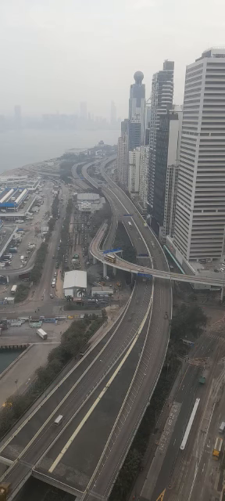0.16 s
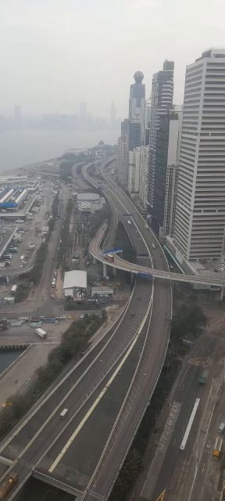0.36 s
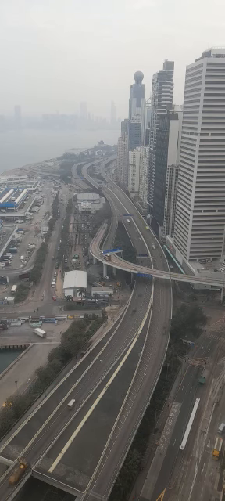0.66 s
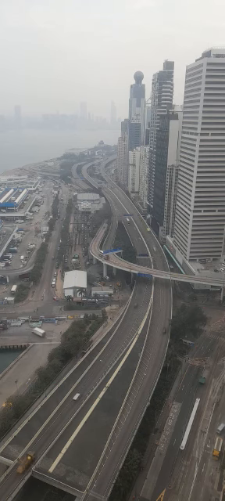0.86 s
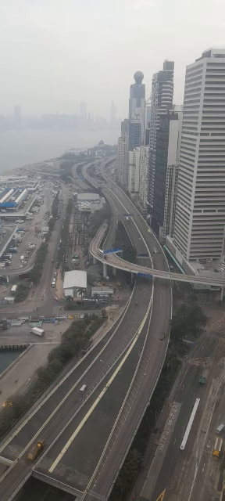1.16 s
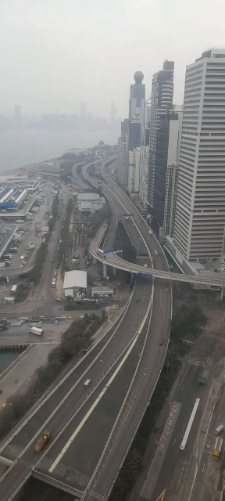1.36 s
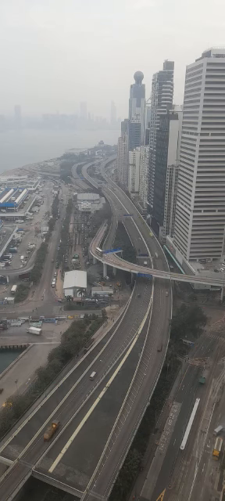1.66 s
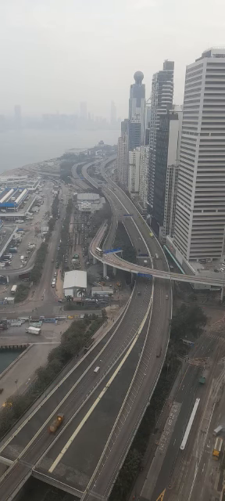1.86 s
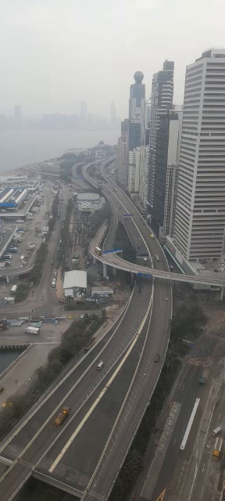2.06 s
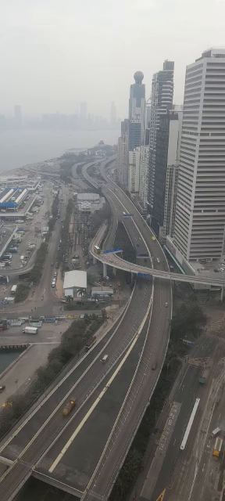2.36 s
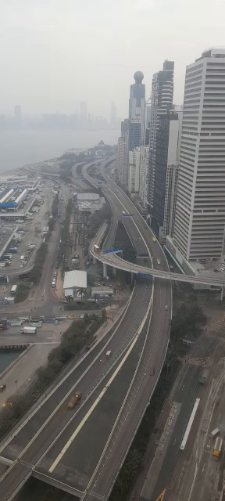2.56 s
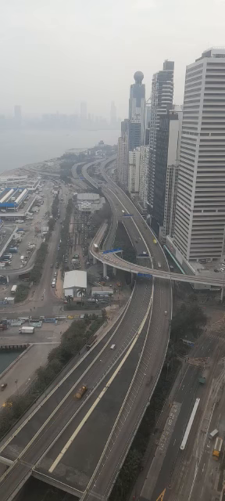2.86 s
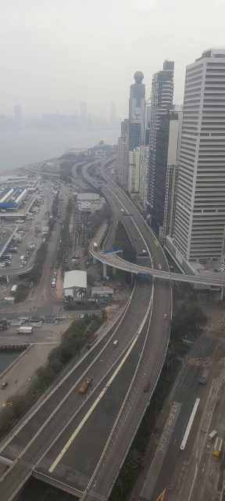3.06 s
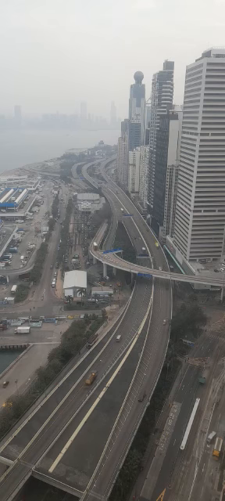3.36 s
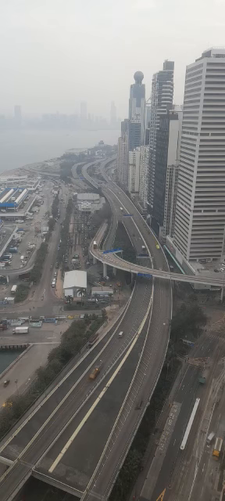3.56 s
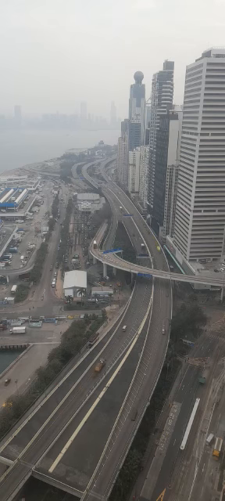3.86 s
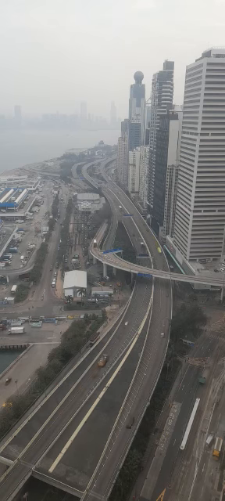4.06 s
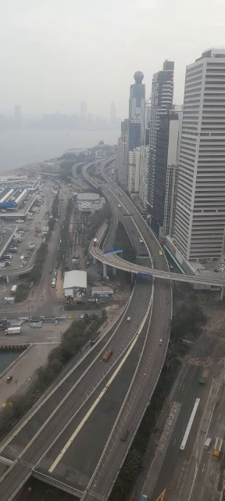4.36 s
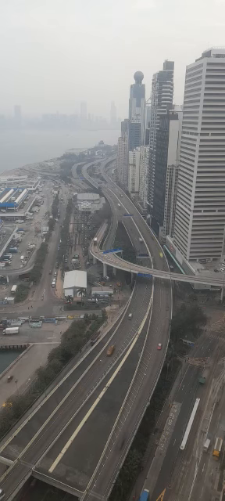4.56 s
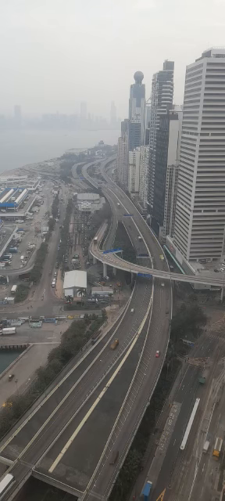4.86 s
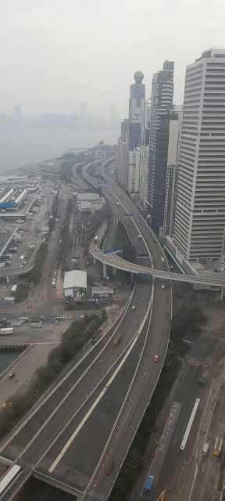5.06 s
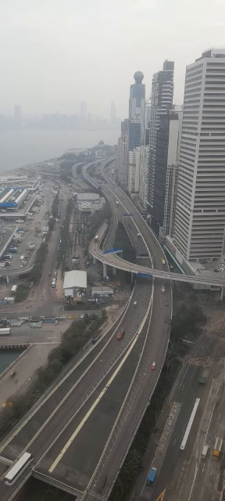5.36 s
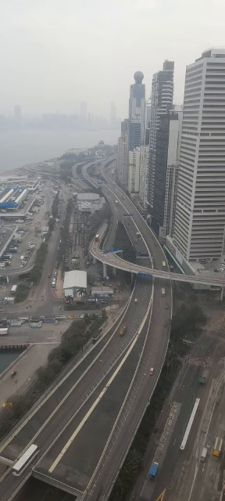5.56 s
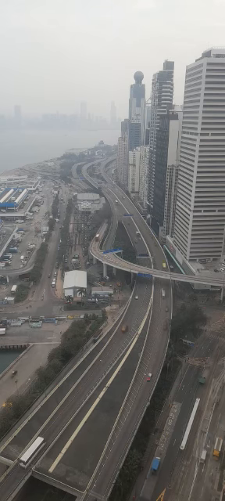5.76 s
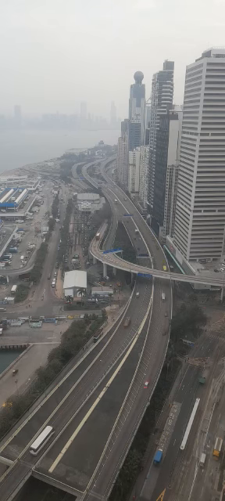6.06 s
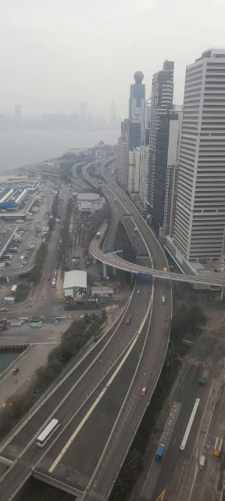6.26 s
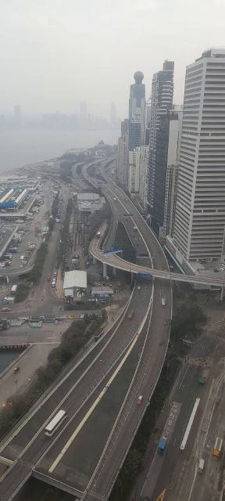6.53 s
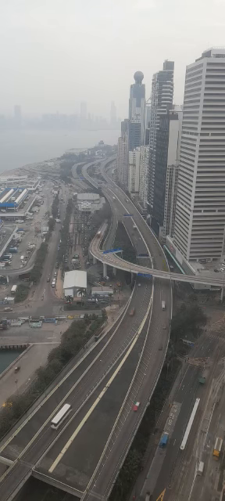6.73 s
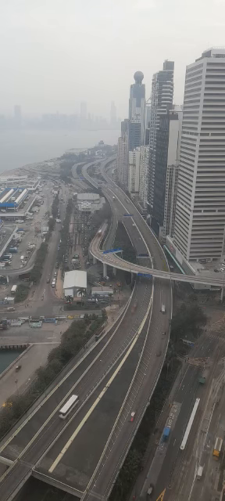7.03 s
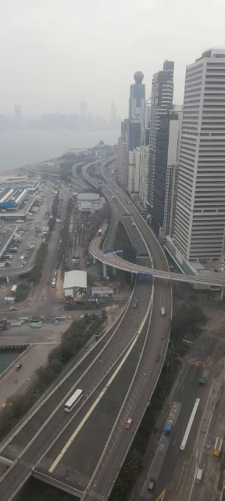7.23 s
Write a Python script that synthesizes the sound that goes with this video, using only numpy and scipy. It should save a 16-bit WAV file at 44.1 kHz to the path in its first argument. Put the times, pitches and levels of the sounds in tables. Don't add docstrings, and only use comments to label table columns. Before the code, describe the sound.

From high above an elevated city highway, a dull continuous rumble of tyres and engines dominates. A ventilation hum wavers on top and a far cutting blade sings thinly, brightest early. Deck joints thump in the first second, small metal knocks follow around two and a half seconds, then faint paired horn toots. A heavy vehicle gathers speed at the end. Distant stereo microphones add light hiss.

```python
import sys
import numpy as np
from scipy import signal
from scipy.fft import rfft, irfft, next_fast_len
from scipy.io import wavfile
from scipy.ndimage import uniform_filter1d

SR = 44100
rng = np.random.default_rng(int(sys.argv[2]) if len(sys.argv) > 2 else 0)


def transcribe(signal):
    frames = np.atleast_2d(signal).T
    limited = np.clip(frames, -1, 1)
    pcm = np.round(limited * 32767).astype(np.int16)
    wavfile.write(sys.argv[1], SR, pcm)


def makeup_ratio(level_db):
    decades = np.asarray(level_db, float) / 20
    return 10 ** decades


N = 325899
T = np.arange(N) / SR


def rms_one(x):
    return x / np.sqrt(np.mean(x ** 2) + 1e-20)


def in_time(rows):
    s, *columns = np.transpose(rows)
    return [np.interp(T, s, c) for c in columns]


def at_hz(points, hz):
    p = np.transpose(points)
    return [np.interp(np.log(hz + 1), np.log(p[0]), c) for c in p[1:]]


def swell(s, length):
    return np.exp(-(2 * (T - s) / length) ** 2)


def gate(s, length, edge_s):
    return np.clip(np.minimum(T - s, s + length - T) / edge_s, 0, 1)


def drift(rate):
    r = np.exp(-80 * np.pi * rate / SR)
    noise = rng.standard_normal(N // 40 + 2002)
    slow = signal.lfilter([1], [1, -2 * r, r * r], noise)[2000:]
    return np.interp(np.arange(N) / 40, np.arange(len(slow)), rms_one(slow))


def glide(rows):
    hz, level_db = in_time(rows)
    start = rows[0][0]
    return hz, makeup_ratio(level_db) * np.clip((T - start + (start == 0)) / 0.17, 0, 1)


def drone(hz, level, wobble_hz, flutter_db, gain_db):
    phase = 2 * np.pi * np.cumsum(hz + wobble_hz * drift(13.0)) / SR
    return np.sqrt(2) * level * makeup_ratio(gain_db + flutter_db * drift(11.8)) * np.sin(phase)


def resonate(x, hz, width_hz):
    r = np.exp(-np.pi * width_hz / SR)
    return signal.lfilter([1, 0, -1], [1, -2 * r * np.cos(2 * np.pi * hz / SR), r * r], x)


# frequency in Hz, likeness 0-1, lead of the left in rad,
# left minus right in dB.
PORTS = [(29.8, 1, -1.5, 3), (70, 0.96, 0.37, -3.5), (110, 0.98, 0.23, 0), (163, 0.97, 0.01, -.5),
         (234, 0.98, 0.24, -.6), (290, 1, 0.3, -5), (415, 0.86, 0.07, -5.5), (600, 0.6, 1.36, -3),
         (714, 0.33, 1, -4.5), (1290, 0.51, 3, -1.5), (1480, 0.54, 2.5, -1), (2170, 0.44, 7, -1.5),
         (2800, 0, 7, -1), (6000, 0.36, 12, 2.5), (16000, 0, 6, 0)]


def at_ports(shared, own):
    size = 2 * (len(shared) - 1)
    alike, lead, pan_db = at_hz(PORTS, np.fft.rfftfreq(size, 1 / SR))
    alike = np.clip(alike, 0, 1)
    side = np.array([[.5], [-.5]])
    common = np.sqrt(alike) * shared * np.exp(1j * lead * side)
    both = common + np.sqrt(1 - alike) * own
    return irfft(both * makeup_ratio(pan_db * side), size)[:, :N]


def arrive(x):
    taper = np.linspace(1, 0, 4096)
    before = (x[:4096] * taper)[::-1]
    after = x[:-4097:-1] * taper
    gap = np.zeros(2 * next_fast_len(N // 2 + 4097) - N - 8192)
    wave = rfft(np.concatenate([x, after, gap, before]))
    return at_ports(wave, wave)


def crowd(spectrum, even_s, ripple_db=0):
    size = 2 * next_fast_len(N // 2 + 1)
    hz = np.fft.rfftfreq(size, 1 / SR)
    ripple = np.interp(hz, np.arange(1200) * 20, rng.standard_normal(1200))
    colour = makeup_ratio(at_hz(spectrum, hz)[0] + ripple_db * ripple)
    waves = rfft(rng.standard_normal((3, N)), size) * colour
    x = at_ports(waves[0], waves[1:])
    span = int(even_s * SR)
    power = uniform_filter1d(uniform_filter1d(x.mean(axis=0) ** 2, span), span)
    return x / np.sqrt(power + 1e-20)


# time in seconds, level in dB.
CUT = [(0, 2), (.5, 1), (1.35, 1.5), (1.46, 0), (1.8, 2.5), (2.04, -0.5), (2.2, 0.5), (2.42, -0.5),
       (3.5, 1), (3.59, -0.5), (3.7, 1.5), (5.78, 0.5), (5.9, 1), (6.55, -1.5), (6.78, 3.5), (6.98, -0.5),
       (7.17, 1.5), (7.26, -2.5)]


def cut_pressure_db():
    return in_time(CUT)[0]


# time in seconds, level in dB.
FLOW = [(0, -56), (.2, -58), (.5, -58), (2.3, -58.5), (2.85, -59), (3.3, -58), (4.1, -55), (5.3, -58),
        (6.0, -55), (6.6, -54), (7.39, -56.5)]
# frequency in Hz, level in dB per Hz.
RUMBLE = [(12, -32), (22, -20), (27, -34), (34, -34), (50, -11.5), (61, 0.5), (70, -1), (95, 0.5),
          (114, 2.5), (135, -1.5), (170, -9.5), (220, -35), (370, -120)]
DRONE = [(100, -37), (170, 0), (232, 0.5), (291, 0.5), (310, 1), (344, -8), (420, -19), (550, -24.5),
         (920, -120)]
ROAR = [(250, -19), (420, -5), (459, -6.5), (618, -4.5), (945, -11.5), (1030, -10.5), (1600, -16),
        (2080, -33), (3520, -120)]
WASH = [(1300, -19), (1600, 1), (2500, 0.5), (3250, -7.5), (3900, -3.5), (4200, -8), (4800, -3),
        (5300, -2.5), (5800, -11.5), (6400, -6), (7150, -6), (7500, -4), (7900, -56), (8400, -63)]
# level in dB at mean flow, share of the flow's swing, own unsteadiness in dB.
DECK_CROWD = (-40.5, 0.31, 0.97)
DRONE_CROWD = (-48, 1, 1.67)
ROAR_CROWD = (-57.5, 1.0, 1)
WASH_CROWD = (-67, .6, 1)
# centre in seconds, length in seconds, level in dB.
AXLES = [(0.366, 0.1, 4.5), (0.85, 0.076, 5), (1.807, 0.043, 7), (2.55, .14, -6.5), (2.9, 0.067, 5.5),
         (3.395, .4, 0.5), (3.873, .18, -6), (4.01, .1, 1.5), (4.187, 0.1, -0.5), (4.44, .16, -5),
         (4.98, 0.13, 0.5), (5.625, 0.1, 1), (6.33, .08, 3), (6.87, 0.16, 2), (7.152, 0.1, 2),
         (7.26, .08, -7), (7.367, .1, 4.5)]


def traffic():
    mean_flow_db, echo_db = -57.5, 1.1
    swing_db = in_time(FLOW)[0] - mean_flow_db
    axles_db = sum(db * swell(s, length) for s, length, db in AXLES)

    def level_db(settings, rate):
        db, share, own_db = settings
        return db + share * swing_db + own_db * drift(rate)

    deck = makeup_ratio(level_db(DECK_CROWD, 5.2) + axles_db) * crowd(RUMBLE, even_s=0.23)
    low = makeup_ratio(level_db(DRONE_CROWD, 2.5) + .3 * axles_db) * crowd(DRONE, even_s=0.19)
    roar = makeup_ratio(level_db(ROAR_CROWD, 1.5)) * crowd(ROAR, even_s=0.15, ripple_db=echo_db)
    wash_db = level_db(WASH_CROWD, 21.0) + 0.47 * cut_pressure_db()
    wash = makeup_ratio(wash_db) * crowd(WASH, even_s=0.21, ripple_db=echo_db)
    return deck + low + roar + wash


# time in seconds, pitch in Hz, level in dB.
VENT = [(0, 291, -51.5), (1.35, 280.2, -51.5), (1.7, 291.8, -45), (3.25, 290, -49), (3.8, 290.5, -46),
        (4.9, 289.4, -47), (5.5, 299, -53), (6.0, 285, -48.5), (7.39, 278.8, -69)]


def ventilation():
    return drone(*glide(VENT), wobble_hz=2.0, flutter_db=2.0, gain_db=-2.5)


# centre in seconds, length in seconds, rise in dB.
IDLING = [(.08, 0.34, 4.5), (0.624, 0.2, 9), (.88, 0.19, 9), (2.2, 0.73, 6), (3.407, 0.76, 7),
          (4.13, 0.41, 10), (4.65, .2, 10), (5.702, 0.37, 11.5), (6.4, .6, 6)]


def idling_engine():
    throb = makeup_ratio(-46 + sum(db * swell(s, length) for s, length, db in IDLING))
    return drone(78.66, throb, wobble_hz=1.857, flutter_db=4.0, gain_db=-5.0)


# pitch in Hz, width in Hz, level in dB.
MOTORS = [(196, 14, -56), (266, 10, -60), (365, 12, -70), (388, 12, -69), (420, 12, -71), (615, 60, -71)]


def motors():
    out = np.zeros(N)
    for hz, width_hz, level_db in MOTORS:
        noise = rng.standard_normal(N)
        band = resonate(resonate(noise, hz, width_hz), hz, width_hz)
        out += makeup_ratio(level_db + 1.3 * drift(1.26)) * rms_one(band)
    return out


BLADE_HZ = [
    [1520, 1770, 1850, 2103, 2291, 2452],
    [4220, 4310, 4468, 3940],
    [5055, 5140, 5462, 5545, 5670, 6005],
    [6654, 6770, 6851, 7350, 7450],
    [8610, 9450, 10900],
]
# width in Hz, level in dB, left minus right in dB.
BLADE = [
    [(35, -12, -12), (32, -5, -5.5), (34, -5.5, -0.5), (21.6, -6, -3), (28, -8, -5), (37, -9.5, -3)],
    [(52, 0, -0.5), (99, -3, -8), (61.7, -1, 1), (25, -9, 6)],
    [(60, -4.5, 2), (57.5, -1.5, -4), (60, 1.5, -5), (40, -1, -7.5), (70, -3, -6), (52.3, -0.5, 2)],
    [(54, -4.5, -13.5), (100, -4, -1), (43.2, -3, -1.5), (90, -5, -5), (60, -13, 3.5)],
    [(110, -13, 3.5), (120, -19, -3), (110, -18.5, -4.5)],
]
# level in dB, change in dB per second, share of pressure, unsteadiness in dB.
FAMILIES = [(-67.5, 0.46, 0.99, 1.5), (-69.5, 0.29, 0.97, 1.0), (-66, -.5, 0.38, 1.0),
            (-63, -1.85, 0.79, 1.0), (-64, -2.5, 1.3, 4)]
# start in seconds, length in seconds, pitch in Hz, level in dB.
SQUEALS = [(0.076, .2, 2291, -66), (.28, .18, 5500, -70), (.59, .22, 2440, -69.5), (.716, 0.21, 5560, -65),
           (.78, 0.28, 6654, -67.5), (0.868, .1, 6005, -61), (.88, 0.27, 2103, -77),
           (1.154, 0.18, 2473, -68.5), (1.16, 0.14, 6005, -65), (1.284, 0.15, 6780, -63.5),
           (1.56, .17, 5480, -67), (1.56, 0.2, 2291, -72.5), (1.77, 0.15, 5560, -60),
           (2.122, 0.17, 6810, -62.5), (2.16, .2, 6005, -73), (3.03, 0.22, 5462, -70),
           (3.227, 0.15, 5550, -64), (4.274, .21, 2291, -67.5), (5.104, 0.078, 7420, -70),
           (6.68, 0.27, 4310, -69), (6.7, .18, 5140, -67), (6.82, .1, 5545, -64), (4.75, .4, 8610, -88)]


def blade():
    out, lag = np.zeros((2, N)), 20
    direct, left, right = rng.standard_normal((3, N))
    rub = 0.63 * np.array([direct, np.roll(direct, lag)]) + 0.79 * np.array([left, right])
    pressure_db = cut_pressure_db()
    for pitches, modes, (db, db_per_s, share, own_db) in zip(BLADE_HZ, BLADE, FAMILIES):
        effort_db = db + db_per_s * T + share * pressure_db + own_db * drift(4.2)
        for hz, (width_hz, level_db, pan_db) in zip(pitches, modes):
            own = np.roll(rub, hz * 31, axis=1)
            tone = resonate(resonate(own, hz, 4 * width_hz), hz, width_hz)
            gain = makeup_ratio(effort_db + level_db - 4 + 1.3 * drift(2.5))
            out += gain * rms_one(tone) * makeup_ratio([[pan_db / 2], [-pan_db / 2]])
    every = np.concatenate(BLADE_HZ)
    for s, length, hz, level_db in SQUEALS:
        span = slice(int(s * SR), int((s + length) * SR))
        nearest = every[np.abs(every - hz).argmin()]
        tone = resonate(rub[:, span], nearest, 3.8)
        out[:, span] += makeup_ratio(level_db) * gate(s, length, 0.057)[span] * rms_one(tone)
    return out


# frequency in Hz, level in dB per Hz.
HISS = [(4650, -17), (7900, 2), (8180, -9), (8530, -3), (10300, -3), (13900, -1), (15600, -5)]


def port_hiss():
    level_db = -75.5 + 0.26 * cut_pressure_db() + 0.43 * drift(7.0)
    return makeup_ratio(level_db) * crowd(HISS, even_s=.3)


# start in seconds, pitch in Hz, level in dB, 60 dB decay in seconds.
THUMPS = [
    (0.289, 187.7, -30, 0.44),
    (0.721, 41.6, -42, 0.99),
]


def thumps():
    out = np.zeros(N)
    for s, hz, level_db, t60 in THUMPS:
        age = np.maximum(T - s, 0)
        rise = 1 - np.exp(-age / 0.029)
        out += makeup_ratio(level_db - 60 * age / t60) * rise * np.sin(2 * np.pi * hz * age)
    return out


# centre in seconds, length in seconds, pitch in Hz, level in dB.
PASSING = [(0.303, 0.402, 103, -44.5), (0.677, 0.48, 116.9, -42), (1.691, .9, 108.2, -40),
           (2.5, .9, 119.1, -41), (3.453, .4, 115, -42), (3.825, 0.196, 103.8, -41),
           (4.104, 0.397, 120.9, -40), (4.616, .6, 104.2, -40), (5.129, 0.306, 116, -37.5),
           (5.4, .4, 107.7, -43)]


def passing_engines():
    near = np.array([makeup_ratio(db) * swell(s, length) for s, length, hz, db in PASSING]) + 1e-12
    hz = np.array(PASSING)[near.argmax(axis=0), 2]
    return drone(hz, near.max(axis=0), wobble_hz=3.71, flutter_db=-1.5, gain_db=-4.0)


# start in seconds, peak in dB.
TICKS = [
    (1.514, -56),
    (2.2275, -53),
    (2.574, -43.5),
    (2.592, -51),
]


def knocks():
    out, noise = np.zeros((2, N)), rng.standard_normal((2, N))
    for s, level_db in TICKS:
        age = np.maximum(T - s, 0)
        click, echoes = makeup_ratio(-60 * age / .012), .35 * makeup_ratio(-60 * age / .2)
        out += (T >= s) * makeup_ratio(level_db - 7) * (click + echoes) * noise
    return signal.sosfilt(signal.butter(4, [1800, 7600], "band", fs=SR, output="sos"), out)


# start in seconds, length in seconds, level in dB.
TOOTS = [
    (4.63, .11, -74),
    (4.94, .16, -73),
    (5.75, .16, -77),
    (6.05, .17, -73),
]


def horn():
    on = sum(makeup_ratio(level_db) * gate(s, length, 0.0074) for s, length, level_db in TOOTS)
    phase = 2 * np.pi * np.cumsum(353.5 + 0.84 * drift(13.3)) / SR
    return on * makeup_ratio(2.5 * drift(20)) * (.6 * np.sin(8 * phase) + np.sin(9 * phase))


# time in seconds, pitch in Hz, level in dB.
PULLING = [(5.5, 76, -42.5), (6.4, 92.52, -39), (7.39, 111.1, -39.5)]
GEARBOX = [(5.85, 223, -28), (6.05, 225.2, -41.5), (6.25, 227, -53), (6.55, 230, -38), (6.85, 230.8, -45),
           (7.2, 234, -38), (7.39, 236.2, -38)]
EXHAUST = [(5.65, 302, -60), (5.82, 312, -39), (5.97, 330, -46.5), (6.22, 339, -45), (6.47, 315, -49),
           (6.7, 326, -39), (6.9, 318, -45), (7.05, 326, -41.5), (7.39, 352, -53.5)]


def pulling_away():
    firing = drone(*glide(PULLING), wobble_hz=1.43, flutter_db=5.5, gain_db=-6.5)
    gearbox = drone(*glide(GEARBOX), wobble_hz=1.0, flutter_db=1.8, gain_db=-6.5)
    exhaust = drone(*glide(EXHAUST), wobble_hz=3.0, flutter_db=2.0, gain_db=-7.5)
    return firing + gearbox + exhaust


def scene():
    engines = ventilation() + idling_engine() + passing_engines() + pulling_away()
    return traffic() + blade() + knocks() + arrive(engines + motors() + thumps() + horn())


def top_cut(x):
    return signal.sosfilt(signal.butter(12, 15800, fs=SR, output="sos"), x)


def record(dry):
    fade = np.clip((T[-1] - T) / .003, 0, 1)
    return top_cut((dry + port_hiss()) * fade)


dry = scene()
out = record(dry)
transcribe(out)
```